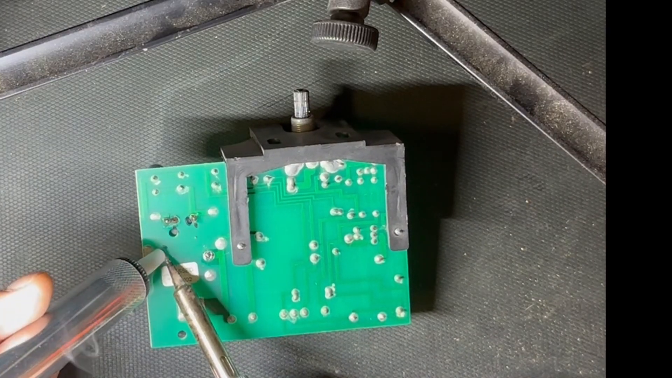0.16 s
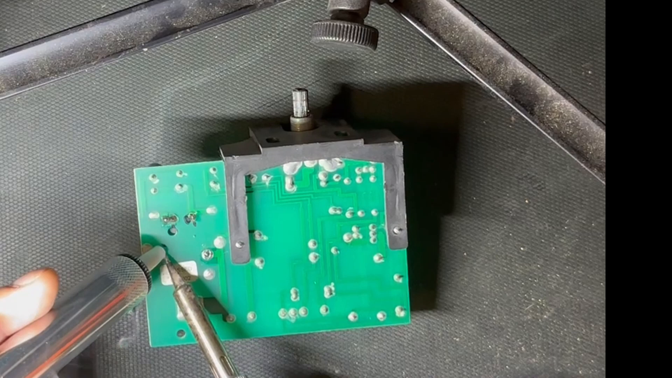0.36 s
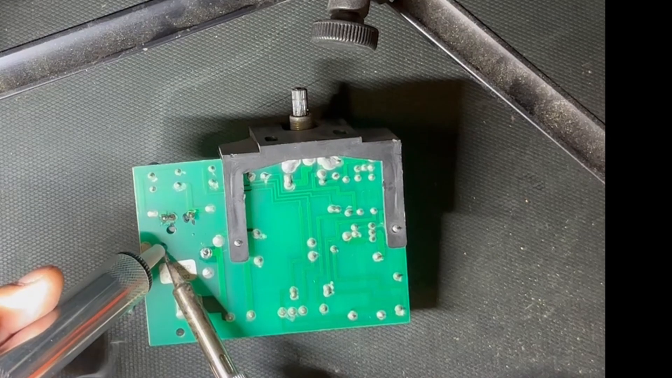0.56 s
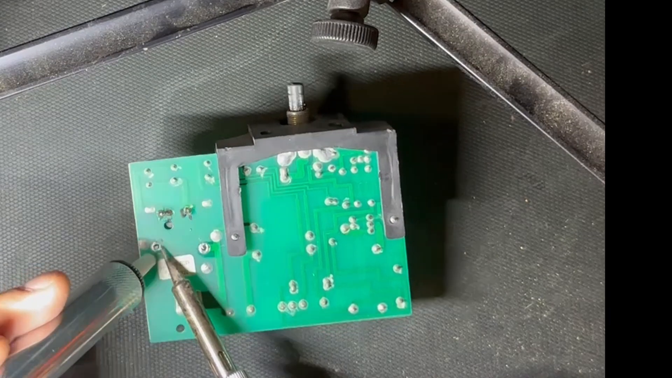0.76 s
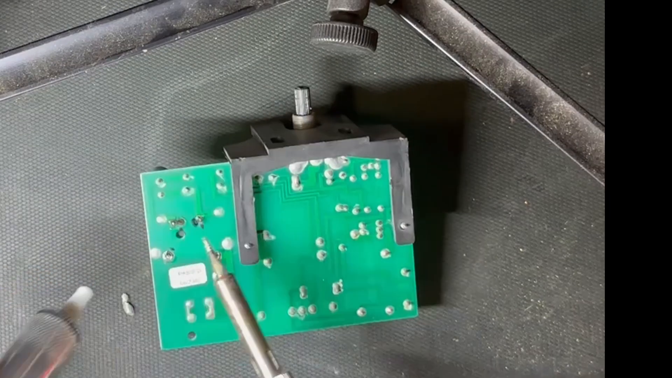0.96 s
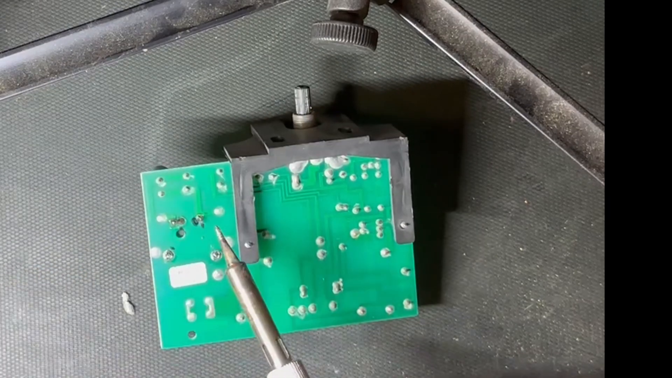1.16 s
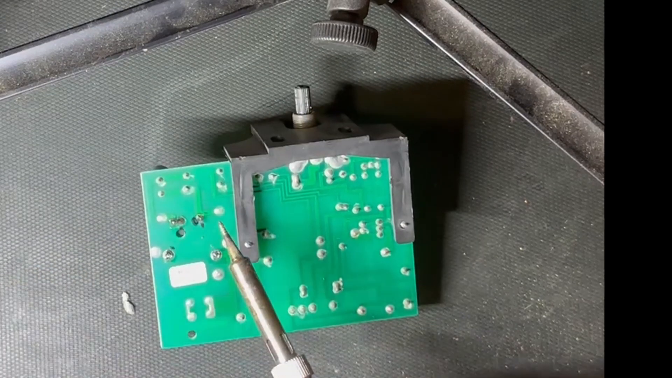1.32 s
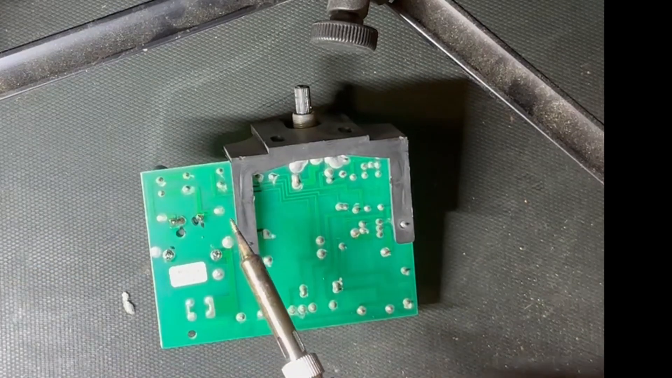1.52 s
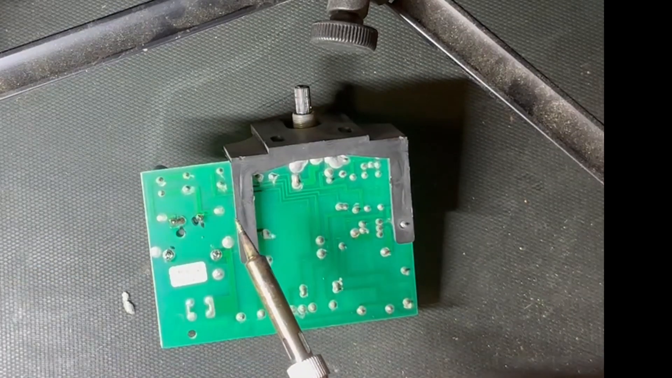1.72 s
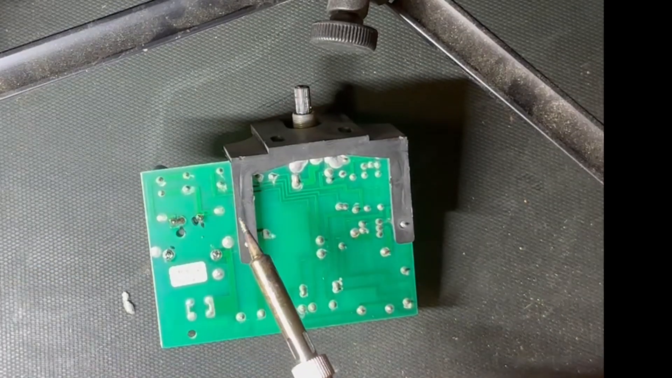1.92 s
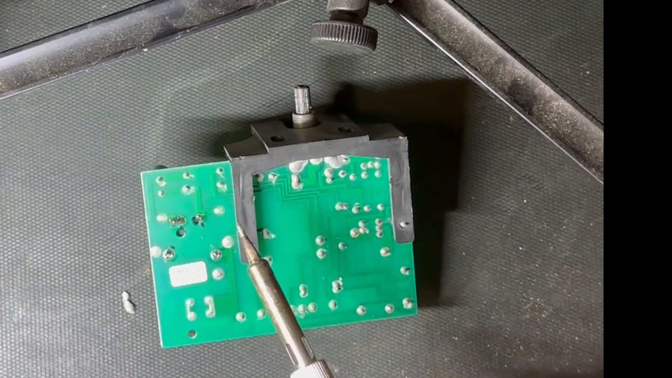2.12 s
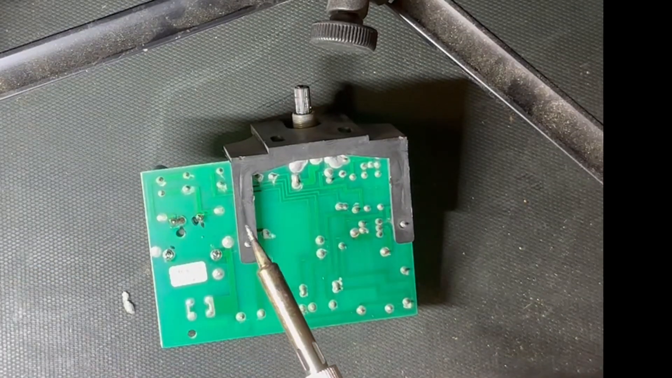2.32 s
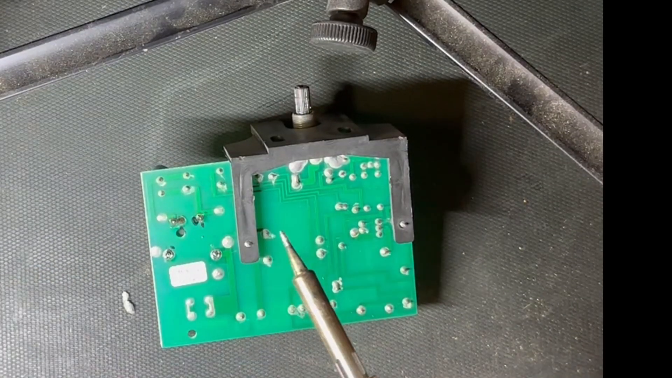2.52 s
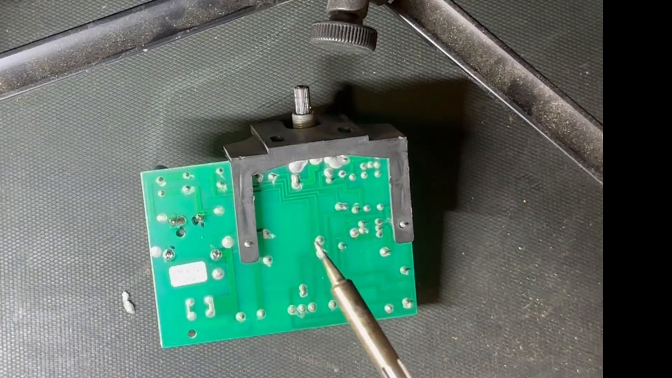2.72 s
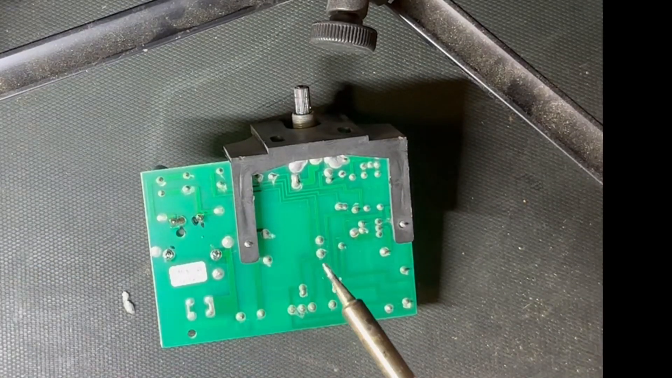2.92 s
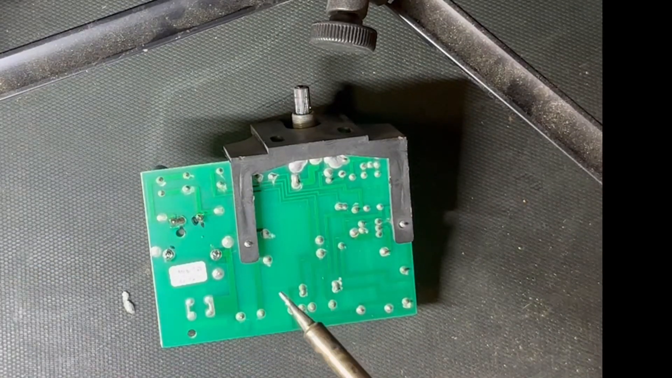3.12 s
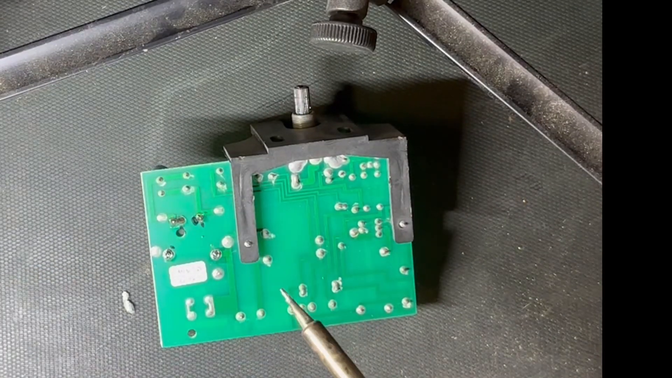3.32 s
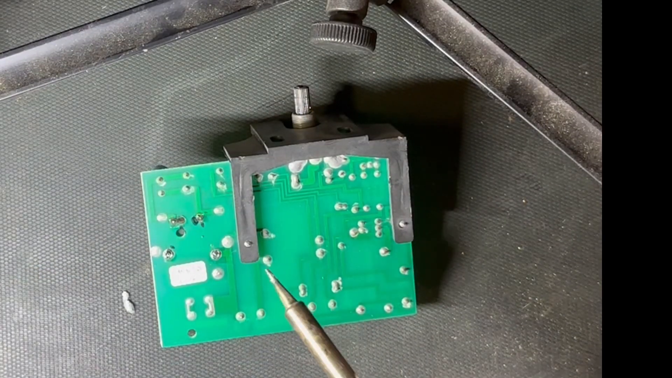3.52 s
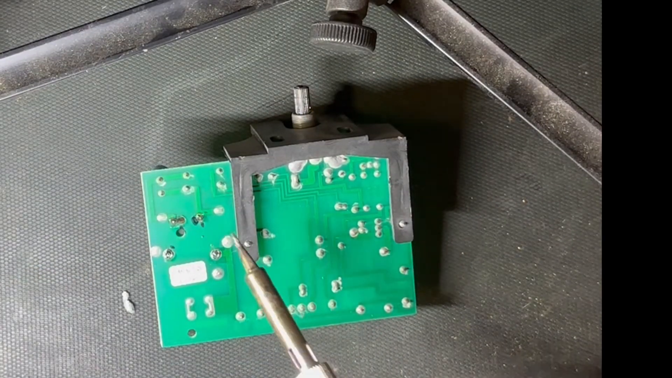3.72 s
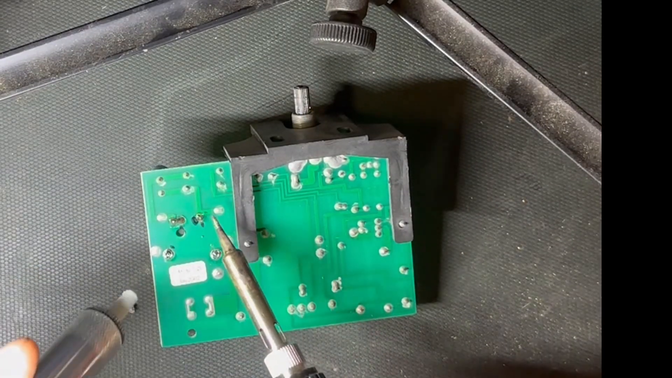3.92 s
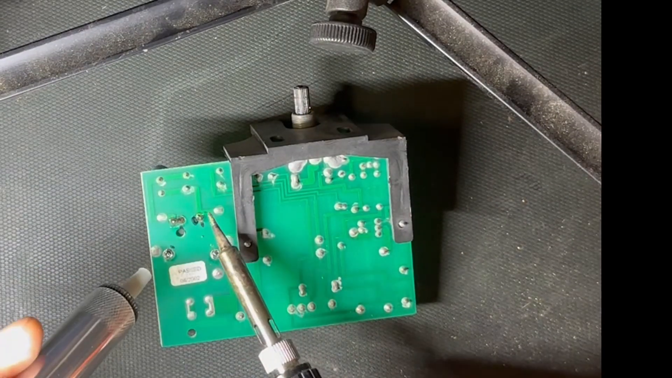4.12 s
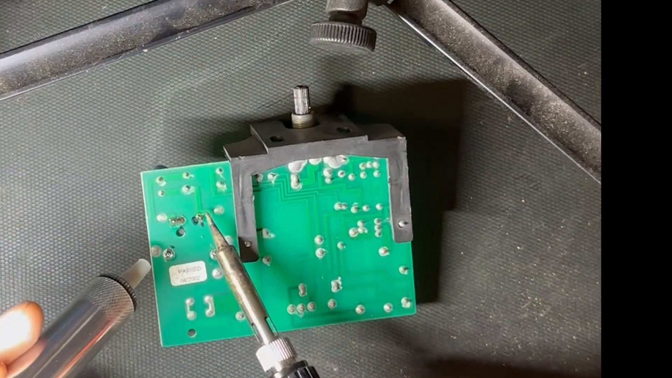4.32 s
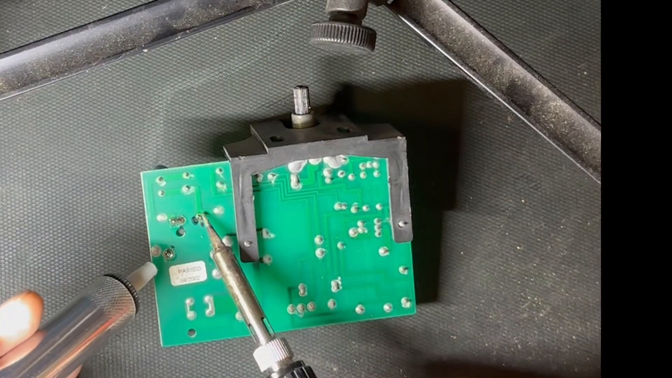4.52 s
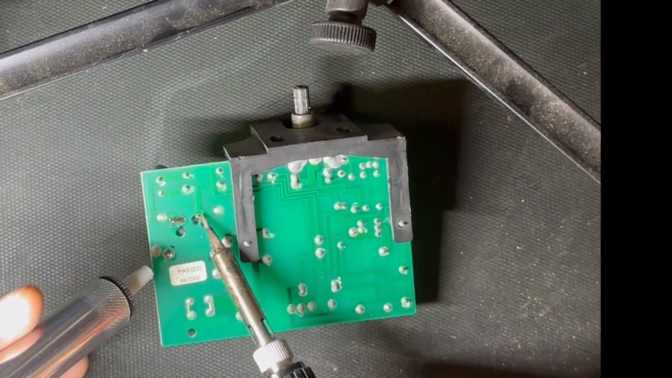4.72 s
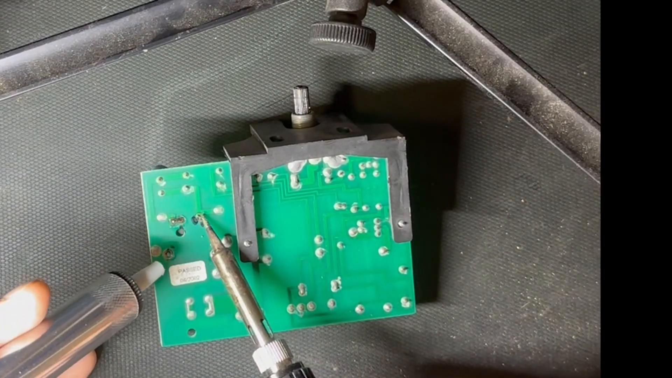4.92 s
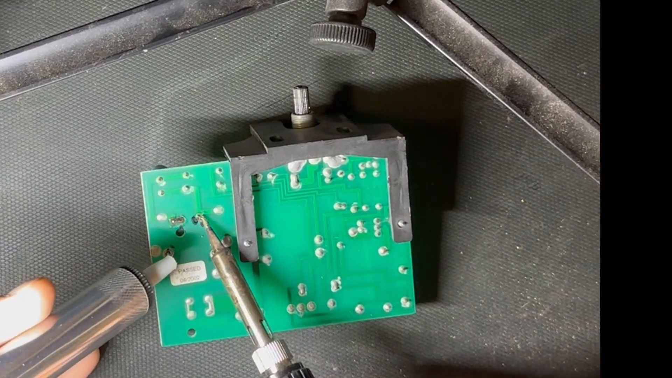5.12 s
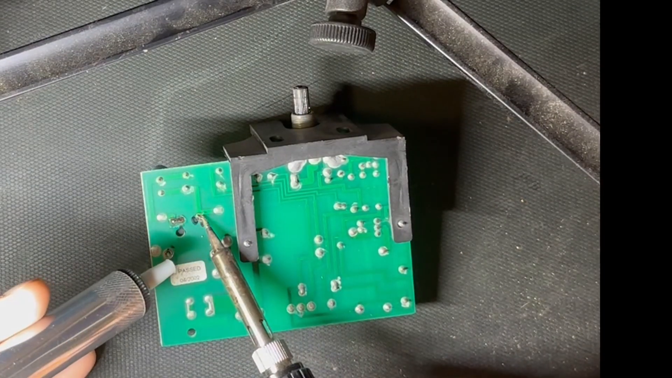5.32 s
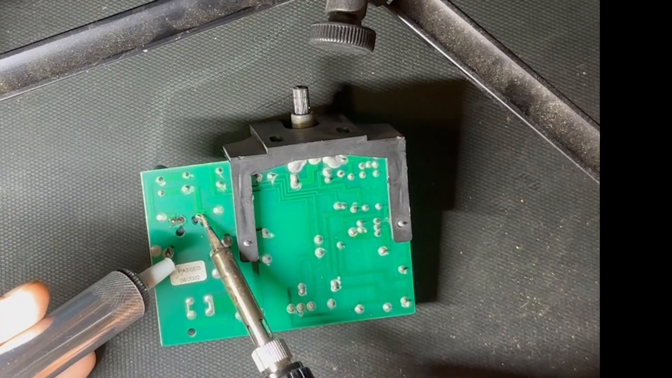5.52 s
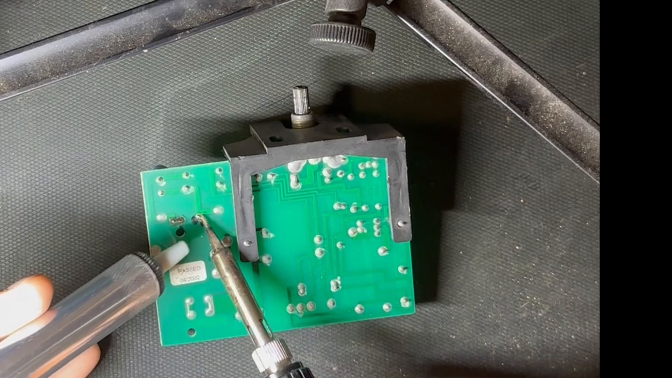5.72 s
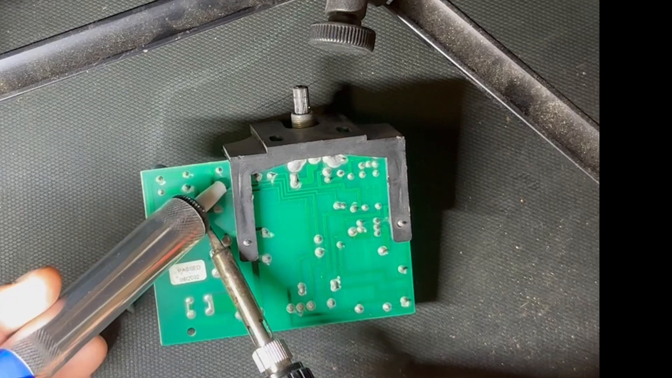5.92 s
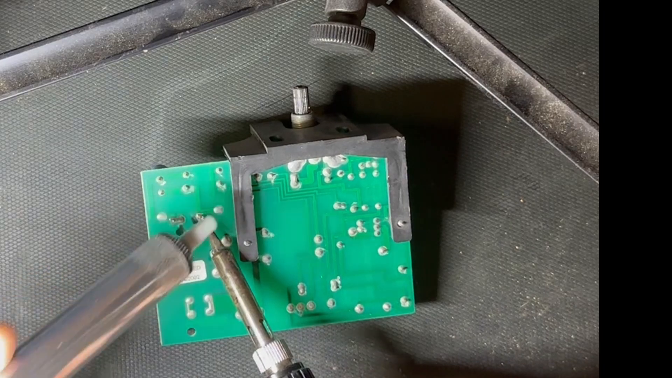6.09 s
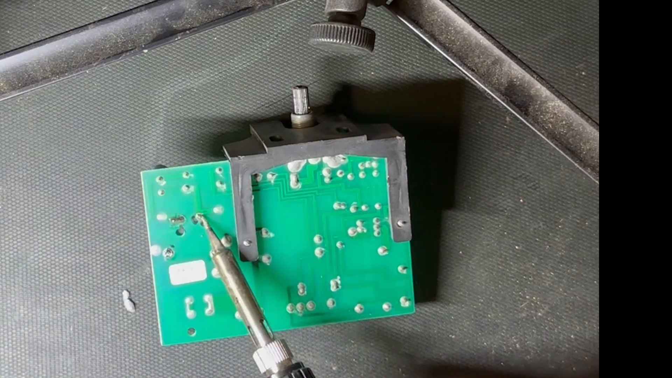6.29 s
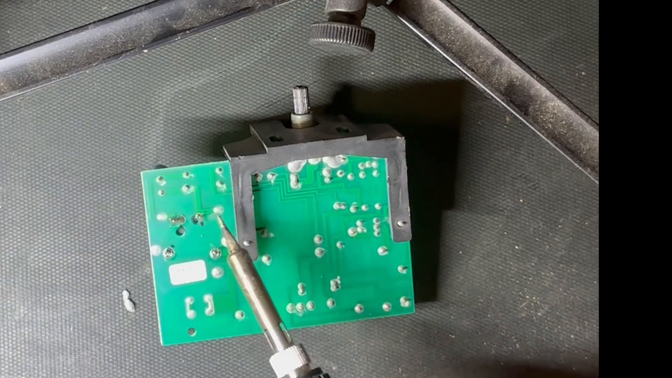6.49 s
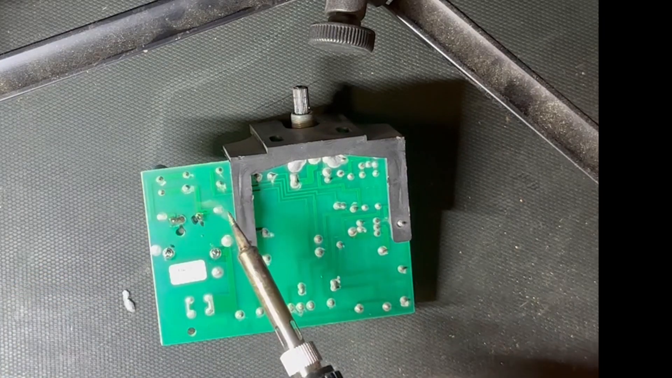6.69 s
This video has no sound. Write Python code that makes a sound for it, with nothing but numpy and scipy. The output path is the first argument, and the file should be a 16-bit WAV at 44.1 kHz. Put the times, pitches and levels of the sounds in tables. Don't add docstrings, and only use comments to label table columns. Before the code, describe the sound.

Close up in a small humming room, a plunger pump slams, its piston is pushed back until it latches and rattles, and later its nozzle lightly taps.

```python
import sys
import numpy as np
from scipy import signal
from scipy.fft import rfft, irfft, next_fast_len
from scipy.io import wavfile
from scipy.ndimage import uniform_filter1d

SR = 44100
rng = np.random.default_rng(int(sys.argv[2]) if len(sys.argv) > 2 else 0)


def put_to_file(sound):
    columns = np.atleast_2d(sound).T
    safe = np.clip(columns, -1, 1)
    whole_steps = np.round(safe * 32767)
    wavfile.write(sys.argv[1], SR, whole_steps.astype(np.int16))


def voltage_ratio(level):
    return 10 ** (np.asarray(level, float) / 20)


N = 302173
SIZE = next_fast_len(N + SR)
HZ = np.fft.rfftfreq(SIZE, 1 / SR)
TIME = np.arange(N) / SR


def along(table, hz=HZ):
    f, v = np.transpose(table)
    return np.interp(np.log(hz + 1), np.log(f + 1), v)


def shape(x, gain):
    return irfft(rfft(x, SIZE) * gain, SIZE)[..., :N]


def modes(table, energy=False, size=SR // 2):
    t = TIME[:size]
    out = 0
    for hz, db, t60 in table:
        one = np.sin(2 * np.pi * hz * t) * voltage_ratio(-60 * t / t60)
        norm = np.sqrt(np.sum(one ** 2)) if energy else 1
        out = out + voltage_ratio(db) * one / norm
    return out


def body(tone, ring=()):
    hz = np.fft.rfftfreq(512, 1 / SR)
    db = along(tone, hz) + 50 * np.log10(np.clip(hz / tone[0][0], .05, 1))
    cep = irfft(db * np.log(10) / 20)
    cep[1:256] = 2 * cep[1:256]
    cep[257:] = 0
    h = irfft(np.exp(rfft(cep)))
    h = np.pad(h / np.sqrt(np.sum(h ** 2)), (0, 4096 - len(h)))
    return h + modes(ring, energy=True, size=4096)


def strokes(table, tone, ring=(), grit_db=3.0, t60_s=.03, softness=.5):
    power = np.zeros(N)
    for s, db, rise in table:
        t60 = t60_s * (rise * 1000) ** softness
        near = slice(int((s - 4 * rise) * SR), int((s + 1.5 * t60) * SR))
        dt = TIME[near] - s
        swell_db = np.where(dt < 0, 20 * dt / rise, -60 * dt / t60)
        power[near] += voltage_ratio(db + swell_db) ** 2
    size_db = np.clip(rng.standard_normal(N // 16 + 1), -2, 2)
    grit = rng.standard_normal(N) * voltage_ratio(grit_db * np.repeat(size_db, 16)[:N])
    return signal.oaconvolve(np.sqrt(power) * grit / grit.std(), body(tone, ring))[:N]


def blows(table, thing, cut_hz):
    force = np.zeros(N)
    for s, db, push in table:
        near = slice(int(s * SR), int((s + push) * SR) + 2)
        u = np.clip((TIME[near] - s) / push, 0, 1)
        force[near] += voltage_ratio(db) * np.sin(np.pi * u) * np.pi / (2 * push * SR)
    highpass = signal.butter(N=2, Wn=cut_hz, btype="high", fs=SR)
    radiated = signal.lfilter(*highpass, modes(thing))
    return signal.oaconvolve(force, radiated)[:N]


def walk(rate):
    k = int(SR / rate)
    steps = np.repeat(rng.standard_normal(N // k + 1), k)
    w = uniform_filter1d(steps, k)[:N]
    return w / w.std()


# frequency in Hz, level in dB per Hz.
AIR = [(20, -24.5), (44, -5.5), (70, -0.5), (129, -7.5), (186, -18.5), (450, -19), (575, -15), (720, -23),
       (900, -24.5), (1300, -25.5), (1800, -27), (3000, -31.5), (4500, -37), (6300, -35)]
# frequency in Hz, level in dB per Hz above AIR's last.
HISS = [(6300, 0.0), (6900, -6), (7500, -10.5), (8300, -11.5), (9300, -15.5), (10500, -13), (11500, -14.5),
        (13000, -22), (15000, -18.5), (15800, -23)]
# frequency in Hz, width in Hz, level in dB.
HUM = [(62, 7.2, -62), (119.5, 12, -66), (637.5, 67, -74), (787.3, 7.8, -75.5), (1586, 5.2, -80.5),
       (1934, 15, -80), (2394, 12, -86), (2550, 15, -83.5)]
# frequency in Hz, side minus mid in dB.
DIFFUSE = [(60, -24), (200, -13.5), (450, -3), (900, 2), (1600, 0.5), (2200, -11.5), (3500, -21),
           (16000, -21)]


def air():
    top_db = AIR[-1][1]
    colour_db = along(AIR + [(hz, db + top_db) for hz, db in HISS[1:]])
    colours = voltage_ratio([colour_db, colour_db + along(DIFFUSE)])
    mid, side = shape(rng.standard_normal((2, N)), colours)
    gain = voltage_ratio(-56.5) / mid.std()
    low = shape(mid, 1 / (1 + (HZ / 180) ** 4))
    heave = voltage_ratio(0.52 * walk(3.2)) - 1
    mid = (mid + low * heave) * gain
    lines = 0
    for hz, width, db in HUM:
        peak = 1 / (1 + (2 * (HZ - hz) / width) ** 4)
        lines = lines + voltage_ratio(db) ** 2 * peak / peak.mean()
    mid = mid + shape(rng.standard_normal(N), np.sqrt(lines))
    whine_hz, whine_db = 799, -72
    whine_level = voltage_ratio(whine_db + 0.79 * walk(4)) * np.sqrt(2)
    mid = mid + whine_level * np.sin(2 * np.pi * whine_hz * TIME + 0.76 * walk(8.2))
    return mid + gain * side * np.array([[1], [-1]])


# start in seconds, level in dB, push length in seconds.
REBOUNDS = [
    (.04, -45.5, 0.003),
    (.886, -20, 0.0054),
    (.893, -22, 0.0061),
    (.918, -22.5, 0.0057),
    (1.02, -44, 0.00081),
    (1.37, -40.5, 0.0075),
    (5.838, -38.5, 0.0013),
    (5.848, -25.5, 0.004),
    (5.865, -27, 0.0059),
]
# frequency in Hz, level in dB, t60 in seconds.
MAT = [(78, -19.5, 0.54), (114, -14.5, 0.088), (136.6, -0.5, 0.25), (158, -12.5, 0.14), (219, -7, 0.14)]
# start in seconds, level in dB, push length in seconds.
BENCH_BLOWS = [
    (.7595, -23.5, 0.0013),
    (.7622, -12.5, 0.0016),
]
# frequency in Hz, level in dB, t60 in seconds.
BENCH = [(62.3, -12, .5), (76.35, -17.5, .3), (138.34, -7.5, 0.2), (170, 0.5, 0.058), (258, -1, 0.031),
         (389, -7.5, 0.041), (464, -15.5, 0.057)]


def bench_booms():
    return -blows(BENCH_BLOWS, BENCH, cut_hz=81) - blows(REBOUNDS, MAT, cut_hz=60)


# peak in seconds, level in dB.
TICKS = [
    (0.731, -52.5),
    (1.2258, -56.5),
    (1.27, -60),
    (2.895, -67),
    (2.92, -61),
    (3.15, -68),
    (3.202, -62),
    (6.763, -57),
]
# frequency in Hz, level in dB per Hz.
TICK_TONE = [(2500, -10.5), (3700, 2), (4700, 4.5), (6300, -1.5), (8500, -11.5), (12000, -19.5),
             (16300, -23)]
# peak in seconds, level in dB, rise in seconds.
SKIN = [(.938, -58.5, .001), (1.0245, -54, 0.00102), (1.142, -73, .002), (1.255, -74, 0.0047),
        (1.41, -77, .01), (2.817, -57, .0006), (3.23, -68, 0.0041), (5.845, -59.5, .008),
        (6.402, -64.5, 0.0014), (6.415, -69, .0015), (6.5, -67, .02), (6.537, -62, 0.0033),
        (6.764, -54, .001)]
# frequency in Hz, level in dB per Hz.
SKIN_TONE = [(5000, -15), (7000, 4), (8500, -0.5), (11000, -10), (14500, -4), (16300, -3)]
# peak in seconds, level in dB, rise in seconds.
FIDGET = [
    (1.598, -54, 0.0065),
    (1.607, -56.5, 0.012),
    (1.62, -67, .004),
    (2.69, -66, 0.0066),
    (5.8, -70, .03),
]
# frequency in Hz, level in dB per Hz.
FIDGET_TONE = [(2500, -9), (3500, -12), (4800, 2), (6000, -11), (7500, -8), (9000, -10), (11000, -23),
               (12500, -14), (14500, -8), (16300, -23.0)]
# start in seconds, level in dB, pitch in Hz.
PINGS = [
    (2.1159, -40, 5618),
    (6.415, -56, 15000),
    (2.897, -49, 1120),
    (2.908, -58, 600),
    (2.92, -58, 4800),
    (3.2015, -47, 3700),
    (6.765, -54, 6000),
]


def touches():
    out = strokes(FIDGET, FIDGET_TONE, grit_db=1.5, t60_s=.034, softness=.35)
    out += strokes(SKIN, SKIN_TONE, grit_db=-1.1, t60_s=.03, softness=0.73)
    ticks = [(s, db, .0015) for s, db in TICKS]
    out += strokes(ticks, TICK_TONE, grit_db=2.5, t60_s=0.03)
    ping_cycles = 21.4
    for s, db, hz in PINGS:
        out += blows([(s, db, 0.22 / hz)], [(hz, 0, ping_cycles / hz)], cut_hz=390)
    return out


# peak in seconds, level in dB, rise in seconds.
RELEASE = [
    (.7455, -47.5, 0.00086),
    (.7505, -19, 0.0014),
    (.7555, -16.5, .003),
    (.7615, -11, 0.00067),
    (.772, -33.5, 0.012),
]
# frequency in Hz, level in dB per Hz.
RELEASE_TONE = [(300, -2.5), (1300, -13.5), (2200, -5.5), (3300, -11), (4500, -11), (5500, -10.5),
                (6600, -11.5), (7500, -12.5), (8500, -12.5), (10000, -14), (11500, -13.5), (13700, -13),
                (15300, -18.5), (16300, -23)]


def release():
    return strokes(RELEASE, RELEASE_TONE, grit_db=2.5, t60_s=0.043, softness=0.37)


# start in seconds, level in dB, push length in seconds.
SLAM = [
    (.7588, -9, 0.00034),
    (.7598, -8.5, 0.0003),
    (.7611, -26.5, 0.00034),
    (.7644, -17, 0.0011),
]
# frequency in Hz, level in dB, t60 in seconds.
BOARD = [(582.3, -5, 0.02), (781, -10, 0.0088), (1018, -4.5, 0.013), (1680, -3, 0.0055), (2064, -4, 0.009),
         (2537, -8.5, 0.015), (3100, -9.5, 0.0099)]


def slam():
    return -blows(SLAM, BOARD, cut_hz=350)


# peak in seconds, level in dB, rise in seconds.
NOZZLE = [
    (1.03, -68, 0.0097),
    (2.472, -45.5, 0.00056),
    (2.5, -69, 0.0036),
    (3.2, -60, .001),
    (5.836, -40, .001),
]
# frequency in Hz, level in dB per Hz.
NOZZLE_TONE = [(400, 5), (1300, -13), (2000, -0.5), (3100, -2.5), (4000, -13.5), (6000, -11.5), (8000, -25),
               (11000, -16), (14500, -40), (16300, -47)]
# start in seconds, level in dB, push length in seconds.
TIP_BLOWS = [
    (5.8355, -45.5, 0.000085),
    (5.85, -58, .0001),
    (5.861, -52.5, .0001),
]
# frequency in Hz, level in dB, t60 in seconds.
TIP = [(1962, 2, 0.041), (2200, 3, 0.024), (3020, -5, 0.027)]


def nozzle():
    brush = strokes(NOZZLE, NOZZLE_TONE, grit_db=2.5, t60_s=0.046, softness=0.8)
    return brush + blows(TIP_BLOWS, TIP, cut_hz=720)


# peak in seconds, level in dB, rise in seconds.
SLIDE = [
    (1.712, -53, .0006),
    (1.733, -44, .0008),
    (2.1155, -34, .0007),
    (2.133, -42.5, .006),
    (2.146, -37, .004),
    (2.163, -34.5, .01),
    (2.195, -39.5, .01),
    (2.222, -39.5, .0015),
]
# frequency in Hz, level in dB per Hz.
SLIDE_TONE = [(500, -13.5), (1220, -8), (1420, -19), (1850, -4.5), (3100, -12), (4800, 3), (6400, -8.5),
              (7400, -5), (8400, 2), (10000, -8.5), (11500, -7.5), (13500, -14.5), (15300, -20),
              (16300, -25.5)]
# frequency in Hz, level in dB, t60 in seconds.
SLIDE_RING = [(1882, -18.5, 0.084), (8000, -18.5, 0.01512)]


def slide():
    return strokes(SLIDE, SLIDE_TONE, SLIDE_RING, grit_db=1.5, t60_s=.045, softness=.8)


# peak in seconds, level in dB, rise in seconds.
KNOB = [
    (1.752, -45.5, .012),
    (1.7635, -16.5, .0018),
    (1.774, -36.5, .008),
    (1.883, -51, .001),
]
# frequency in Hz, level in dB per Hz.
KNOB_TONE = [(200, -18.5), (480, -15), (880, -24), (1250, -13), (1600, -25), (2550, -1.5), (3150, -10),
             (4100, -10), (4700, -1), (5500, -10), (7200, -7), (9500, -14.5), (14000, -10.5),
             (16300, -23.5)]
# frequency in Hz, level in dB, t60 in seconds.
KNOB_RING = [(2521, -22, 0.0055), (4830, -18, .005)]


def knob():
    return strokes(KNOB, KNOB_TONE, KNOB_RING, grit_db=2.7, t60_s=0.027, softness=.4)


# start in seconds, level in dB, push length in seconds.
BARREL_BLOWS = [
    (1.764, -44.5, .0003),
    (2.28, -41, 0.0016),
    (2.438, -30, 0.00039),
    (2.473, -66, 0.0014),
    (2.897, -52.5, 0.00031),
    (2.918, -60, .0006),
]
# frequency in Hz, level in dB, t60 in seconds.
BARREL = [(390, -6.5, 0.064), (470, 4.5, 0.02), (731.5, -15, 0.015), (1190, -13, 0.04)]


def barrel():
    return blows(BARREL_BLOWS, BARREL, cut_hz=92)


# start in seconds, level in dB, push length in seconds.
LATCH_BLOWS = [
    (2.24715, -14, 0.000035),
    (2.24765, -7, 0.000052),
    (2.2502, -20.5, .00008),
]
# frequency in Hz, level in dB, t60 in seconds.
CATCH = [(1960, -22.5, .02), (4230, -3.5, 0.012), (4470, -1.5, .017), (4785, -4, .018), (5228, -7, 0.019),
         (7462, -6, .007), (8250, 0.5, .009), (9540, -7, 0.007), (11200, -5, .005), (12100, -7.5, 0.004),
         (15300, -3.5, .004)]


def catch():
    return blows(LATCH_BLOWS, CATCH, cut_hz=4500)


# peak in seconds, level in dB, rise in seconds.
LATCH = [
    (2.2478, -26, .0004),
    (2.2503, -25, .0004),
    (2.256, -31, .0022),
    (2.28, -39, .011),
    (2.32, -44, .013),
]
# frequency in Hz, level in dB per Hz.
LATCH_TONE = [(500, -12), (1200, -13), (2000, -9.5), (2500, -18), (3500, -6.5), (4300, 2), (5200, -3),
              (6100, -9), (7400, -6.0), (8400, -7), (10000, -9), (11500, -15), (14000, -17), (16300, -29.5)]


def latch():
    return strokes(LATCH, LATCH_TONE, grit_db=-0.3, t60_s=0.0328, softness=0.72)


# peak in seconds, level in dB, rise in seconds.
RATTLE = [
    (2.4305, -32.5, .004),
    (2.4368, -15, 0.00087),
    (2.4398, -22.5, 0.0012),
    (2.472, -44.5, .0009),
]
# frequency in Hz, level in dB per Hz.
RATTLE_TONE = [(1000, -14.5), (1450, -27), (2450, -1), (3500, -3.5), (4500, -5), (5300, -0.5), (6000, -8.5),
               (6700, -3.5), (7600, -5.5), (8900, -3.5), (10500, -4), (12000, -8.5), (13800, -1.5),
               (16300, -19.0)]
# frequency in Hz, level in dB, t60 in seconds.
RATTLE_RING = [(3570, -22, 0.095), (4300, -22, 0.15), (9600, -25.5, .01)]


def rattle():
    return strokes(RATTLE, RATTLE_TONE, RATTLE_RING, grit_db=3.5, t60_s=0.02, softness=.95)


# band centre in Hz, level in dB, t60 in seconds.
ROOM = [(100, -9.5, 0.34), (600, -15, 0.51), (1950, -13, 0.31), (4530, -17.5, 0.41), (8550, -15.5, 0.29),
        (14000, -20.5, 0.27)]


def room(x):
    t = TIME[:SR // 2]
    tail = 0
    centres = np.log([r[0] for r in ROOM])
    hz = np.fft.rfftfreq(len(t), 1 / SR)
    for k, (_, db, t60) in enumerate(ROOM):
        share = np.sqrt(np.interp(np.log(hz + 1), centres, np.arange(len(ROOM)) == k))
        mid, side = rfft(rng.standard_normal((2, len(t)))) * share
        side = side * voltage_ratio(along(DIFFUSE, hz))
        fade = voltage_ratio(-60 * t / t60) * np.clip(t / 0.018, 0, 1)
        noise = irfft([mid + side, mid - side], len(t))
        tail = tail + voltage_ratio(db) * noise * fade / np.sqrt(np.sum(fade ** 2))
    return signal.fftconvolve(x[None], tail, axes=1)[:, :N]


def scene():
    cocking = slide() + knob() + barrel() + latch()
    pump = touches() + release() + nozzle() + cocking
    bench, hit, snap, shake = bench_booms(), slam(), catch(), rattle()
    direct = pump + shake + hit + snap + bench
    to_walls = pump + 0.76 * shake + 0.4 * hit + 0.25 * snap + .25 * bench
    return direct + room(to_walls) + air()


# frequency in Hz, left minus right in dB.
PORT_DB = [(60, 0.46), (300, 1.5), (800, 3.5), (1200, -3), (1700, -5), (2100, -4), (2500, 0), (16000, 1.4)]
# frequency in Hz, left's lead in radians.
PORT_RAD = [(900, 0), (2600, .6), (6950, .7), (8000, 5.6), (8500, 5.8), (11250, 3.14), (14400, 0),
            (15600, -.7)]


def two_ports(dry):
    bass_cut_hz, top_hz = 44, 16000
    half = along(PORT_DB) * np.log(10) / 40 + .5j * along(PORT_RAD)
    top = 1 / np.sqrt(1 + (HZ / top_hz) ** 90)
    highpass = signal.butter(N=3, Wn=bass_cut_hz, btype="high", fs=SR, output="sos")
    cut = signal.sosfilt(highpass, dry)
    return shape(cut, np.exp([half, -half]) * top)


def top_cut(x):
    return signal.sosfilt(signal.butter(12, 16980, fs=SR, output="sos"), x)


def record(dry):
    return top_cut(two_ports(dry))


dry = scene()
out = record(dry)
put_to_file(out)
```